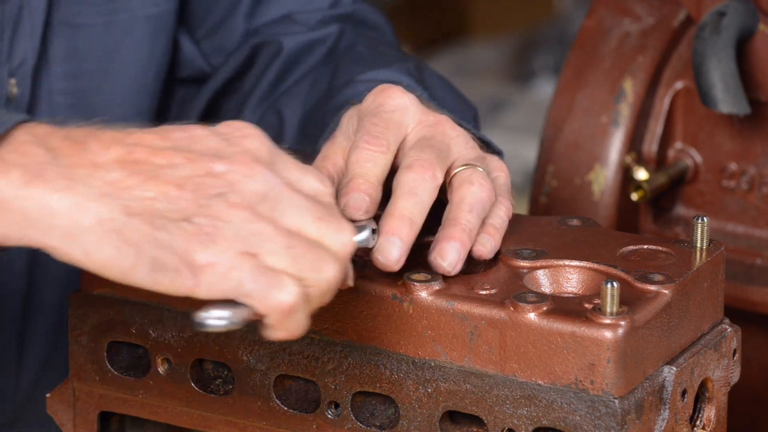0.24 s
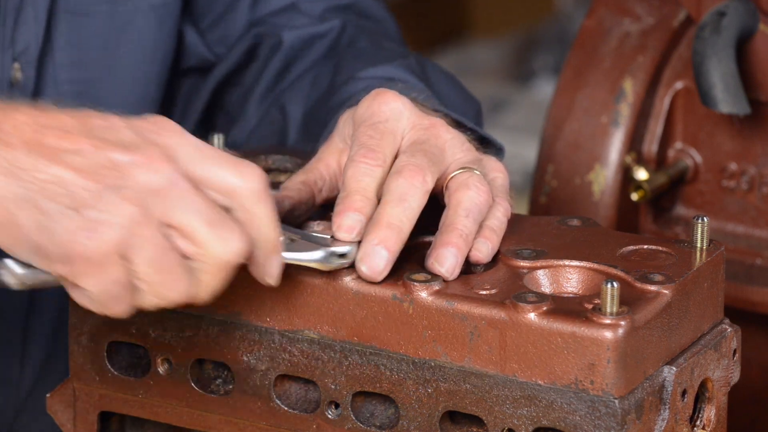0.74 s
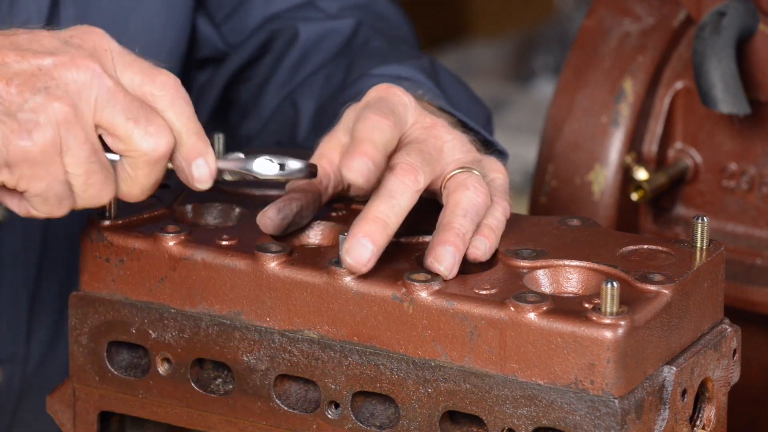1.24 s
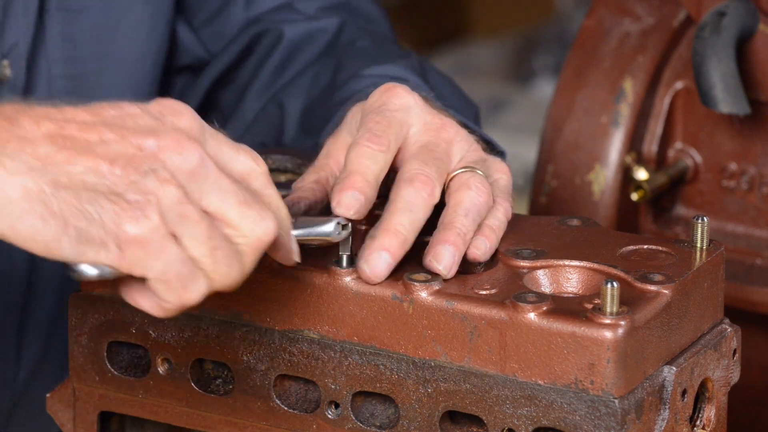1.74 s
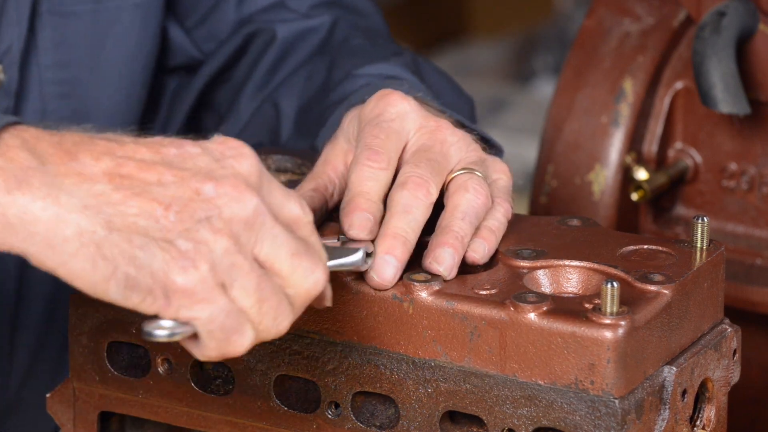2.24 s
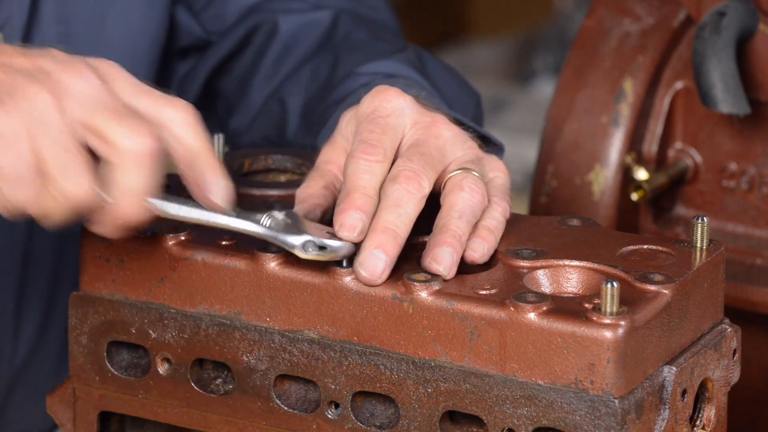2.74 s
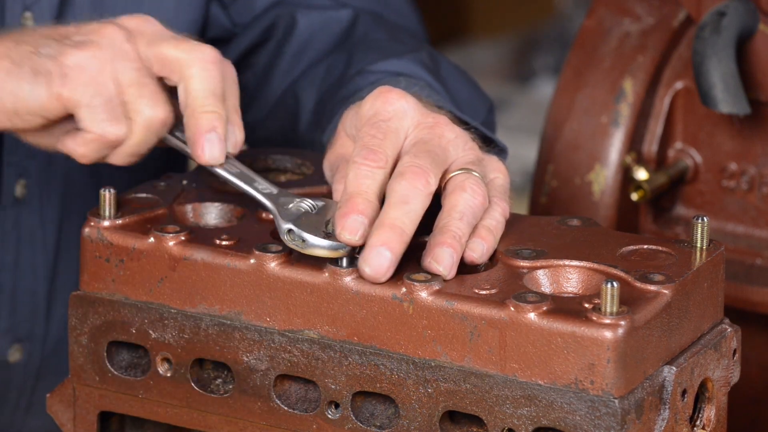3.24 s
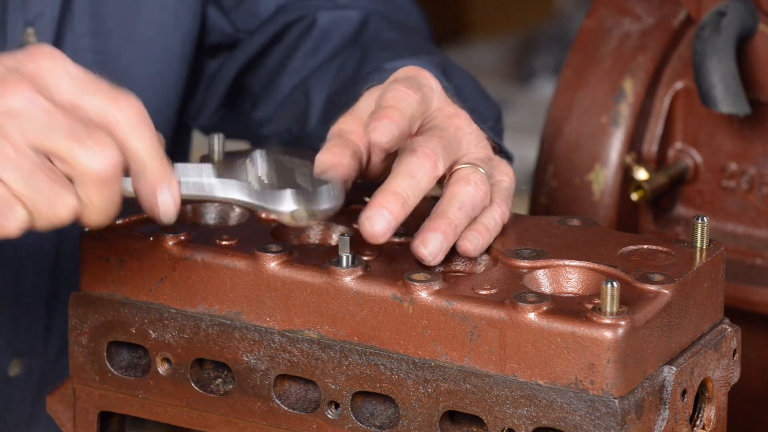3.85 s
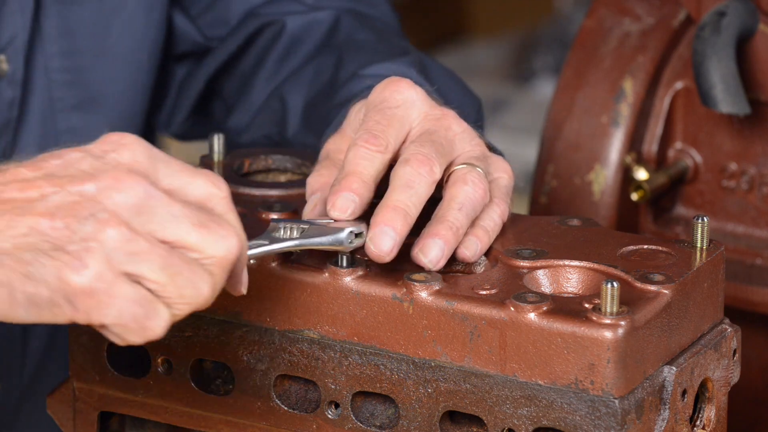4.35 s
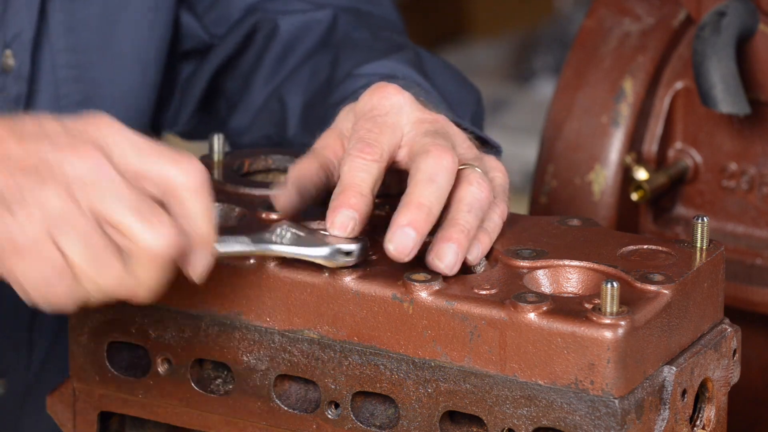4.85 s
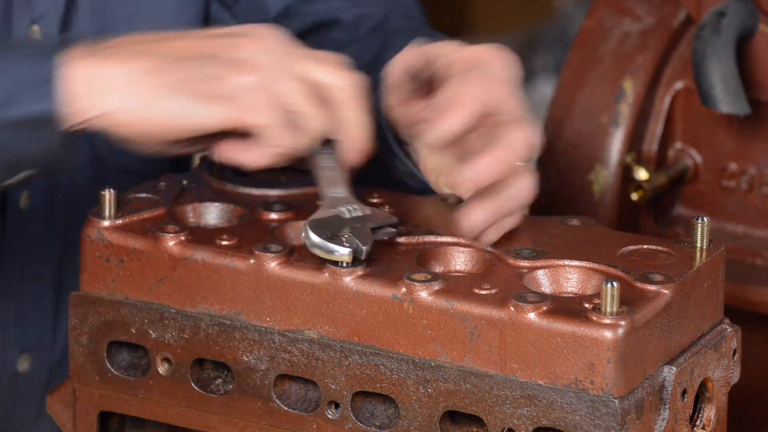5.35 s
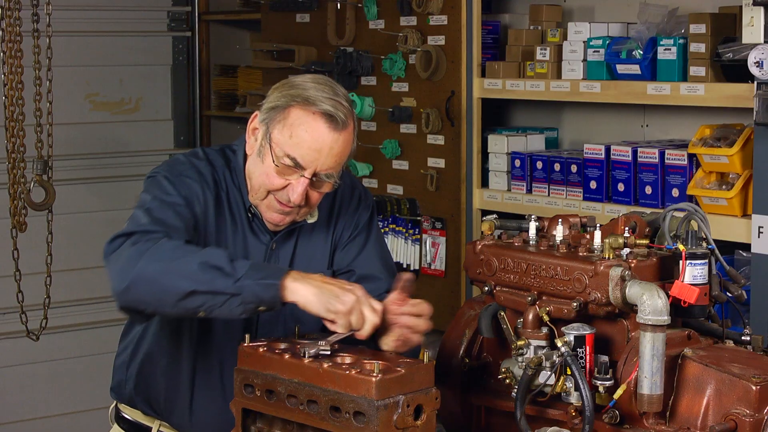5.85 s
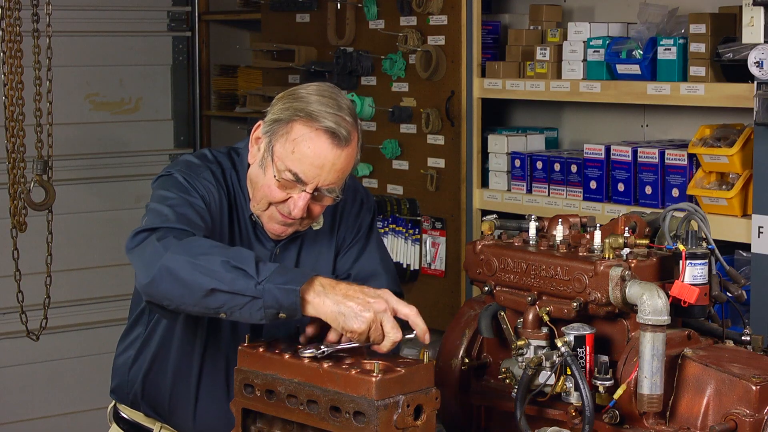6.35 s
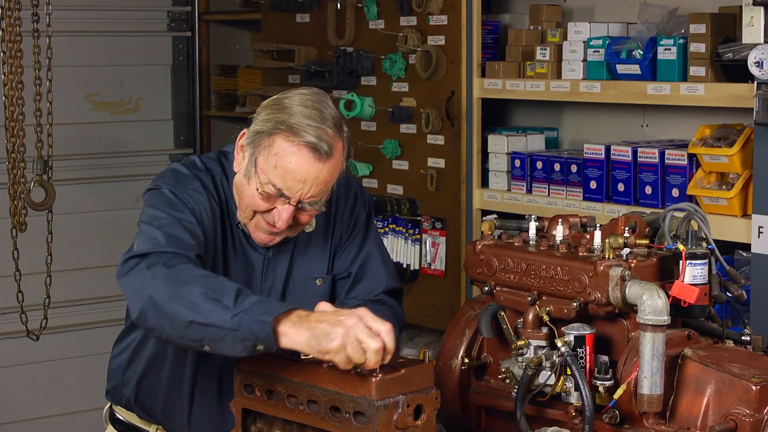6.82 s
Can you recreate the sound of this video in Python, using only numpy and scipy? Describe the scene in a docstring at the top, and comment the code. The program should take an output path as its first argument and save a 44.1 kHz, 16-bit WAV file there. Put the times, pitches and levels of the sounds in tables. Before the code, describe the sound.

Close metallic ticks, gritty thread grinding and low creaks from an engine block, then bright wrench clacks, soft sleeve rustle and faint hum.

```python
"""Turning a thread tap by hand

A hand turns a threading tap in a cast-iron engine block with an adjustable wrench, in a quiet workshop.
Bursts of clicks ring the steel for the ticks, clacks and slips of the loose jaw; soft pushes thud the stand.
Grainy noise through the same ringing parts grinds the thread, a wavering tone groans and sine tones squeak.
Shaped noise gives rustling sleeves and air, over a low hum; a fading noise tail is the small room."""
import sys
import numpy as np
from scipy import signal
from scipy.fft import rfft, irfft
from scipy.io import wavfile
from scipy.ndimage import uniform_filter1d

SR = 44100
rng = np.random.default_rng(int(sys.argv[2]) if len(sys.argv) > 2 else 0)


def materialize(psi):
    """Save the field psi as 16-bit PCM at rate SR to the path in sys.argv[1].

    A 1-D psi becomes a single channel; in a 2-D psi each row is a channel.
    """
    bounded = np.clip(np.atleast_2d(psi).T, -1, 1)
    quanta = np.round(bounded * 32767).astype(np.int16)
    wavfile.write(sys.argv[1], SR, quanta)


N = 312228  # length in samples
DELAY_S = .001  # every contact, thud and squeak starts this many seconds after its listed time


def undb(db):
    """Turn decibels into a plain gain."""
    return 10 ** (np.asarray(db) / 20)


def unit(x):
    """Scale a sound to an average (RMS) level of 1."""
    return x / np.sqrt(np.mean(x ** 2))


def colour(x, points):
    """Shape a noise by (Hz, dB) points."""
    hz, db = np.transpose(points)
    f = np.maximum(np.arange(len(x) // 2 + 1) * SR / len(x), 1)
    gain = undb(np.interp(np.log(f), np.log(hz), db))
    return irfft(rfft(x) * gain, len(x))


def walk(rate):
    """Wander at random: levels held for 1 / rate seconds, then smoothed twice; spread near 1."""
    k = int(SR / rate)
    steps = np.repeat(rng.standard_normal(N // k + 1), k)
    return 1.3 * uniform_filter1d(uniform_filter1d(steps, k), k)[:N]


def rings(modes, size=12000):
    """Make one decaying sine for each way (mode) a part can ring."""
    hz, db, t60 = np.transpose(modes)[:, :, None]
    t = np.arange(size) / SR
    fade = np.exp(-np.log(1000) * t / np.maximum(t60, .01))
    return undb(db) * np.sin(2 * np.pi * hz * t) * fade


def favour(f, hz, octaves):
    """Gain that falls off either side of hz on a log axis."""
    return np.exp(-.5 * (np.log2(f / hz) / max(octaves, .2)) ** 2)


def add(out, s, db, *parts):
    """Mix (dB re peak, sound) parts into out, DELAY_S after time s."""
    i = int((s + DELAY_S) * SR)
    for part_db, x in parts:
        out[i:i + len(x)] += undb(db + part_db) * x / np.abs(x).max()


def curve(table):
    """Join the rows of a table by straight lines, giving one curve per column after the time."""
    s, *columns = np.transpose(table)
    return [np.interp(np.arange(N) / SR, s, c) for c in columns]


# Sharp jaw contacts. Each row: start in seconds, peak of the dry crack in dB, brightest frequency in Hz,
# handle ring in dB above the crack, block ring in dB above the crack, strongest block frequency in Hz.
JAW_HITS = [(0.1265, -15.5, 7840, -19.5, -10.5, 640), (0.2907, -32, 6560, -16, -10.5, 666),
            (0.5742, -39, 5830, -13, -19, 678), (0.601, -27.5, 8600, -24, -16.5, 676),
            (0.64, -30.5, 8350, -25, -30, 680), (0.9735, -57, 3300, -13, -6, 690),
            (1.0216, -45, 3320, 0, 5.5, 660), (1.4032, -30.5, 5500, -13.5, -8, 730),
            (1.508, -25, 7640, -19, -25, 660), (1.6131, -36, 5360, -12.5, -3.5, 660),
            (1.7587, -48, 3320, -6, 1, 678), (1.95, -52, 9820, -2, -8, 875),
            (1.9723, -22.5, 6650, -28, -18, 895), (1.9761, -23.5, 7400, -11, -28, 756),
            (1.9998, -38, 3440, -37, -31, 1290), (2.0095, -28.5, 7900, -21, -36, 754),
            (2.0256, -22, 5200, -16.5, -12.5, 1000), (2.2697, -29, 3360, -21, -4, 684),
            (2.5441, -28, 7600, -33, -21.5, 476), (2.6601, -42.5, 3270, -6.5, -10, 960),
            (2.6895, -64, 5300, -2, 12.5, 970), (3.1394, -58, 10200, -21, -18, 791),
            (3.5303, -53, 10600, -28, -15, 694), (3.676, -57.5, 3460, -1, 11.5, 689),
            (3.7064, -44.5, 3600, -11, -3, 505), (3.7439, -34.5, 5400, -15, -5.5, 830),
            (3.7594, -44.5, 3430, -1.5, -11, 805), (3.7973, -46.5, 3450, -9, 3.5, 797),
            (4.0418, -33, 6400, -46, -36, 519), (4.1091, -48, 9000, -20, -22, 848),
            (4.122, -54, 2200, -12, -25, 848), (4.4208, -3.5, 6100, -16, -54, 1270),
            (4.4424, -21, 8000, -8.5, -12, 1230), (4.4801, -19, 6230, -23, -18, 536),
            (4.6733, -45.5, 3460, -8, 3.5, 905), (4.778, -14, 7700, -18, -25, 665),
            (4.8083, -5, 7160, -15.5, -29, 1346), (4.8123, -7, 7660, -17.5, -28.5, 457),
            (5.0129, -57, 1980, 0, -13, 738), (5.5874, -55.5, 2500, -9, 10.5, 492),
            (5.8169, -38.5, 2890, -11, -21, 740), (6.4893, -38, 2700, -10.5, -22.5, 427)]
# Short slides that swell and fade. Each row: start in seconds, peak of the dry crack in dB,
# brightest frequency in Hz, length scale in ms, block ring in dB above the crack, strongest block Hz.
JAW_SLIPS = [(0.834, -59, 1950, 10, -19, 676), (1.1977, -56, 1940, 10, 7.5, 680),
             (1.3862, -41.5, 3230, 7.4, 0.5, 503), (1.4037, -34, 5350, 11, -38, 684),
             (1.6207, -44, 5400, 4, -18, 692), (1.9865, -25, 2850, 32, -33, 764),
             (2.0284, -39.5, 2540, 9.5, -6, 940), (2.1346, -38.5, 1800, 26, -4.5, 910),
             (2.1685, -42, 2540, 11.2, -2, 474), (2.2746, -29.5, 1940, 16.7, -7.5, 626),
             (2.3435, -54.5, 5380, 18, 12, 681), (2.3989, -47, 2570, 13, -4, 604),
             (2.4986, -35.5, 5230, 18.7, -5.5, 715), (2.7188, -75.5, 1744, 4.8, 21, 920),
             (3.7434, -39, 1890, 13, -4, 824), (3.808, -42.5, 7500, 14, -21, 740),
             (3.8235, -33, 3600, 16, -12, 756), (4.8984, -46, 2730, 43, 3, 840),
             (4.9548, -44, 1300, 19.5, 7.5, 690), (4.9839, -50.5, 1256, 13.3, 6, 790),
             (5.214, -55.5, 1315, 20, -22.5, 1310), (5.3594, -51.5, 5580, 29.5, -12, 760),
             (5.8259, -47, 6880, 18, -25, 719), (6.362, -46, 3350, 38, -13.5, 695)]
# Ringing of the wrench jaws. Each row: usual pitch in Hz, usual level in dB, time to fade by 60 dB in seconds.
JAW_MODES = [(3240, -4.5, 0.12), (3643, -15.5, 0.018), (4160, -5, 0.035), (4800, -7.5, .04),
             (4707, -5, 0.086), (4865, -11.5, .05), (5260, -12, 0.21), (5582, 5.5, .04),
             (6270, -1.5, 0.038), (6370, -24.5, 0.078), (7696, 7, 0.096), (8200, 2, 0.022),
             (8630, 1, 0.021), (9050, -2, 0.04), (9660, -7.5, 0.037), (10540, -14, 0.014), (14700, -8, .02),
             (15500, -15.5, .02)]
# Bending of the handle. Each row: usual pitch in Hz, usual level in dB, time to fade by 60 dB in seconds.
HANDLE_MODES = [(1840, -2.5, .06), (1961.5, 4, 0.097), (2329, 2, 0.041), (2580, 1, 0.097),
                (2706, -11, 0.061)]
# Ringing of the iron block. Each row: pitch in Hz, level in dB, time to fade by 60 dB in seconds.
BLOCK_MODES = [(476.1, -1.5, 0.11), (699, -1.5, 0.11), (802, 3, 0.048), (961, -9, 0.12), (1323, -6.5, .05)]
CHATTER_MS, CHATTER_MS_PER_DB = 4.82, 0.11  # a full-scale blow chatters longest
HIT_JAW_DB, SLIP_JAW_DB, SLIP_HANDLE_DB = -8.5, -6, -17  # ring above the crack's peak
# width of the favoured range at 3 kHz, less by NARROWING for each octave brighter
WIDTH_OCTAVES, NARROWING, BLOCK_OCTAVES = 1.077, 0.22, .32


def contacts(scatter_db=2.5, crack_ms=0.7, detune=.004, rattle=1.6):
    """Clicks make the crack and ring the jaws; a short push (hits) or the clicks (slips) ring handle and block."""
    block = rings(BLOCK_MODES, size=7000)
    flutter = 1 + rattle * walk(330)
    out = np.zeros(N + 20000)
    t_ms = np.arange(4000) * 1000 / SR
    f = np.maximum(np.arange(257) * SR / 512, 50)
    soft = 1 / (1 + (f / 12000) ** 4)  # the crack softens gently above 12 kHz
    hits = [(s, db, hz, CHATTER_MS + CHATTER_MS_PER_DB * db, HIT_JAW_DB, *rest, True)
            for s, db, hz, *rest in JAW_HITS]
    slips = [(s, db, hz, ms, SLIP_JAW_DB, SLIP_HANDLE_DB, *rest, False)
             for s, db, hz, ms, *rest in JAW_SLIPS]
    for s, db, hz, ms, jaw_db, handle_db, block_db, block_hz, sharp in hits + slips:
        chance = rng.standard_normal((3, len(t_ms)))
        ms = max(ms, .2)
        clicks = chance[0] * np.abs(chance[0])
        chatter = clicks * np.exp(-(t_ms / ms) ** (1.6 if sharp else 3))
        if sharp:
            chatter *= np.minimum(t_ms / .5 + .3, 1)
            chatter[22] = 4  # the main click, half a millisecond in
        else:
            chatter *= t_ms / ms  # a slip swells first
        octaves = WIDTH_OCTAVES - NARROWING * np.log2(hz / 3000)
        crack = np.roll(irfft(soft * favour(f, hz, octaves)), 6) * np.exp(-t_ms[:512] / crack_ms)
        # the grip shifts the steel's modes a little from one contact to the next
        steel = np.array(JAW_MODES + HANDLE_MODES)
        steel[:, 0] *= 1 + detune * chance[2, :len(steel)]
        steel[:, 1] += scatter_db * chance[1, :len(steel)]
        # the loose jaw rattles on, so every mode flutters as it fades
        flutter_start = rng.integers(N - 5000, size=(len(steel), 1))
        ring = rings(steel, size=5000) * flutter[flutter_start + np.arange(5000)]
        # the struck spot favours the modes near its brightest frequency
        jaws = len(JAW_MODES)
        jaw = favour(steel[:jaws, 0], hz, octaves) @ ring[:jaws]
        bend = ring[jaws:].sum(axis=0)
        boom = favour(np.array(BLOCK_MODES)[:, 0], block_hz, BLOCK_OCTAVES) @ block
        push = np.hanning(12) if sharp else chatter
        add(out, s, db,
            (0, signal.fftconvolve(chatter, crack)),
            (jaw_db, signal.fftconvolve(chatter, jaw)),
            (handle_db, signal.fftconvolve(push, bend)),
            (block_db, signal.fftconvolve(push, boom)))
    return out[:N]


# Knocks passed into the stand. Each row: start in seconds, peak in dB before the low cut,
# strongest frequency in Hz, length of the push in ms.
KNOCKS = [(0.129, -24, 175, 6.2), (0.133, -25.5, 323, 5.2), (0.289, -48, 226, 18), (0.65, -39.5, 164, 15),
          (1.031, -40, 264, 9.5), (1.256, -47.5, 237, 8.3), (1.391, -39.5, 234, 8.3),
          (1.613, -36.5, 196, 3.4), (1.97, -42, 237, 13), (2.18, -43, 334, 7.8), (2.282, -39, 390, 16.7),
          (2.439, -41, 191, 9.5), (2.549, -47.5, 223, 7.9), (3.354, -50.5, 167, 15),
          (3.698, -40.5, 178, 21), (4.422, -34, 218, 8.3), (4.488, -37, 210, 5.8), (4.806, -27.5, 215, 7.6),
          (4.956, -35.5, 242, 8), (5.599, -44.5, 191, 6), (5.905, -45.5, 296, 19), (5.943, -46, 310, 12),
          (6.411, -50, 318, 11), (6.499, -48, 159, 5.8)]
# Ringing of the stand. Each row: pitch in Hz, level in dB, time to fade by 60 dB in seconds.
STAND_MODES = [(175, 1, 0.19), (214.3, 6.5, 0.11), (256.7, -1, 0.12), (309.8, -3, 0.07), (357, -20, 0.082)]


def thuds():
    """A soft push rocks the stand, mostly in the mode nearest the knock."""
    out, stand = np.zeros(N + 20000), rings(STAND_MODES)
    for s, db, hz, ms in KNOCKS:
        size = int(ms * SR / 1000)
        push = np.hanning(size) * np.cos(2 * np.pi * hz * np.arange(size) / SR)
        boom = favour(np.array(STAND_MODES)[:, 0], hz, 0.27) @ stand
        add(out, s, db, (0, signal.fftconvolve(push, boom)))
    low_cut = signal.butter(2, 110, "high", fs=SR, output="sos")
    return signal.sosfilt(low_cut, out[:N])


# Brief squeaks of steel on steel. Each row: start in seconds, peak in dB, middle pitch in Hz, length in ms.
STEEL_SQUEAKS = [(.77, -57, 6500, 26), (1.398, -35, 5440, 9.9), (2.347, -45, 5440, 19),
                 (2.396, -47, 5780, 16), (2.506, -42, 5630, 20), (3.445, -59.5, 1400, 7.9),
                 (5.45, -60.5, 1940, 54), (6.802, -67, 1277, 38.9), (6.901, -72, 2545, 177)]


def squeaks(rough=.012):
    """Quick regular stick-slip: a short tone with an unsteady pitch."""
    out = np.zeros(N + 20000)
    wobble = 1 + rough * walk(300)
    for s, db, hz, ms in STEEL_SQUEAKS:
        size = int(ms * SR / 1000)
        phase = 2 * np.pi * np.cumsum(hz * wobble[int(s * SR):][:size]) / SR
        add(out, s, db, (0, np.hanning(size) * np.sin(phase)))
    return out[:N]


def grit(rate, spread_db):
    """Dense tiny slips of uneven size and sign, rate of them per second."""
    slips = (rng.random(N) < rate / SR) * rng.standard_normal(N)
    return slips * undb(spread_db * rng.exponential(size=N))


def driven(modes, x, wander_db=3.5):
    """Let a sound ring a part; as the point of contact wanders, each mode comes and goes."""
    return unit(sum(signal.oaconvolve(x, ring)[:N] * undb(wander_db * walk(9))
                    for ring in rings(modes, size=6000)))


# Cutting of the tap. Each row: time in seconds, groan of the block in dB, thread grinding in dB,
# load on the stand in dB.
CUTTING_LEVELS = [(0, -71, -64, -54), (.12, -75, -60.5, -56), (.25, -64.5, -74.5, -60), (.6, -55, -72, -57),
                  (.9, -55.5, -74, -55), (1.2, -59.5, -75, -57.5), (1.45, -72, -66, -54.5),
                  (1.65, -71, -81, -62), (1.85, -65, -80, -62.5), (2.05, -59, -74, -53),
                  (2.17, -63, -56.5, -51.5), (2.38, -55.5, -62, -52.5), (2.53, -66, -59, -55.5),
                  (2.62, -97, -74, -66), (2.8, -101, -77, -71.5), (4.36, -88.5, -86, -72.5),
                  (4.75, -80.5, -75, -67.5), (4.9, -71.5, -61, -65), (4.99, -70, -66, -54),
                  (5.07, -85, -85.5, -64.5), (5.3, -88.5, -70, -65), (5.6, -79, -66.5, -62),
                  (6.43, -79, -77, -64), (6.66, -91, -79, -64.5), (7.08, -91.5, -78, -65.5)]


def cutting():
    """Stick-slip at the tap makes the block groan, grinds the thread and loads the stand."""
    groan_db, grind_db, load_db = curve(CUTTING_LEVELS)
    # the cutting edge partly locks to the block's main mode
    main_mode = BLOCK_MODES[1:2]
    phase = 2 * np.pi * np.cumsum(main_mode[0][0] * (1 + .012 * walk(30))) / SR
    locked = np.sin(phase) * undb(3.5 * walk(40))
    loose = driven(main_mode, rng.standard_normal(N), wander_db=0)
    groan = unit(unit(locked) + undb(-3) * loose)
    chips = grit(1500, 1.6) * undb(2.5 * walk(22))
    crunch = unit(colour(chips, [(150, -31), (330, -1), (800, -5), (1500, -13.5), (4000, -43)]))
    grind = driven(BLOCK_MODES, chips) + undb(-8.0) * crunch
    load = driven(STAND_MODES, rng.standard_normal(N) * undb(3.0 * walk(12)))
    return undb(groan_db) * groan + undb(grind_db) * grind + undb(load_db) * load


# The wrench rubbing on steel. Each row: time in seconds, handle rub in dB, jaw scraping in dB.
SLIDING_LEVELS = [(0, -74, -79), (.37, -71, -67), (.69, -66.5, -66), (1.12, -74.5, -66.5), (1.83, -78, -79),
                  (2.09, -70, -67), (2.15, -58.5, -58.5), (2.4, -63, -59.5), (2.53, -63, -58),
                  (2.62, -98, -86), (2.9, -87, -83), (3.14, -83.5, -74.5), (3.45, -88, -85.5),
                  (3.71, -100, -77.5), (3.88, -83, -74), (4.2, -86, -79.5), (4.67, -84, -74.5),
                  (4.86, -72.5, -73), (4.97, -64, -64), (5.06, -84, -76), (5.4, -74.5, -74.5),
                  (5.94, -77.5, -68.5), (6.4, -76, -67.5), (6.66, -86.5, -77.5), (7.08, -78.5, -76.5)]


def sliding():
    """Stick-slip grit rings handle and jaws, with a duller and a brighter rubbing noise."""
    handle_db, scrape_db = curve(SLIDING_LEVELS)
    slips = grit(3500, 1.1) * undb(2.4 * walk(60))
    rub = unit(colour(slips, [(900, -19.5), (1600, -5.0), (2200, -8.5), (3000, -7.0), (6000, -42.0)]))
    handle = undb(4) * driven(HANDLE_MODES, slips) + rub
    rasp = unit(colour(slips, [(1500, -24.5), (3000, -2.0), (5500, 1.5), (9000, -5.0), (16000, -22.5)]))
    scrape = undb(-10.5) * driven(JAW_MODES, slips) + rasp
    return undb(handle_db) * handle + undb(scrape_db) * scrape


# How loud the sleeves are. Each row: time in seconds, rustle in dB.
RUSTLE_LEVELS = [(0.0, -70.5), (0.59, -68.5), (1.87, -74), (1.99, -65), (2.15, -67), (2.4, -67.5),
                 (2.64, -99), (2.9, -77.5), (3.1, -73), (3.63, -81.5), (3.92, -74), (4.18, -81),
                 (5.3, -72.5), (6.03, -65), (6.7, -73), (7.08, -74)]
# Tone of the cloth. Each row: frequency in Hz, relative level in dB per Hz.
CLOTH_TONE = [(590, -30.5), (1000, -2.5), (1880, -8), (3940, -4), (11700, -6), (15200, -10), (15900, -13.5),
              (16500, -36.5)]


def sleeves():
    """Cloth gives a soft wide rustle: unsteady noise with a broad treble."""
    rustle_db, = curve(RUSTLE_LEVELS)
    cloth = unit(colour(rng.standard_normal(N) * undb(0.82 * walk(25)), CLOTH_TONE))
    return undb(rustle_db) * cloth


# How long the room rings. Each row: frequency in Hz, time to fade by 60 dB in seconds.
ROOM_FADE = [(300, 0.38), (2000, 0.35), (6000, 0.24), (14000, 0.11)]
ROOM_DB = -11.5  # room tail against the direct sound


def room(x):
    """Shelves and walls answer with a dense tail that dies faster in the treble."""
    t, tail = np.arange(20000) / SR, 0
    hz, t60 = np.transpose(ROOM_FADE)
    for f in 177 * 2. ** np.arange(7):  # one band per octave
        octave = signal.butter(2, [f / 2 ** .5, f * 2 ** .5], "band", fs=SR, output="sos")
        band = signal.sosfilt(octave, rng.standard_normal(len(t)))
        tail = tail + band * np.exp(-np.log(1000) * t / np.interp(np.log(f), np.log(hz), t60))
    tail = tail * np.clip(t / 0.0036 - .4, 0, 1)  # starts just after the direct sound
    return undb(ROOM_DB) * signal.fftconvolve(x, tail / np.sqrt(np.sum(tail ** 2)))[:N]


# Tone of the still air. Each row: frequency in Hz, relative level in dB per Hz.
AIR_TONE = [(12, -36.5), (20, -7), (44, 0.5), (71, 2), (156, -10), (224, -15.5), (404, -30.5), (670, -27),
            (1560, -32), (1950, -39.5), (2120, -34), (3830, -57), (15200, -40), (16500, -61.5)]
AIR_DB = -60.0  # average (RMS) level
HUM_HZ, HUM_DB = 62.9, -62  # middle pitch and middle RMS level


def air():
    """Rumble and hiss as shaped noise, with a wavering low hum."""
    phase = 2 * np.pi * np.cumsum(HUM_HZ * (1 + 0.02648 * walk(3.0))) / SR
    hum = np.sqrt(2) * np.sin(phase) * undb(HUM_DB + 2.7 * walk(4))
    return undb(AIR_DB) * unit(colour(rng.standard_normal(N), AIR_TONE)) + hum


OWN_DB = -41.5  # room and air that differ between the two sides


def scene():
    """Add up the work at the block, its room and the air, for two sides."""
    near = contacts() + thuds() + squeaks() + cutting() + sliding() + sleeves()
    mono = near + room(near) + air()
    # the two sides hear room and air a little differently
    side = undb(OWN_DB) * (room(near) + air())
    return np.array([mono + side, mono - side])


LEFT_DB, HISS_DB = -.7, -79  # left gain against right; hiss before the top is cut
TOP_HZ = 16300


def record(dry):
    """Two channels of slightly unlike gain, each with its own faint microphone hiss; the top is cut."""
    gains = undb([[LEFT_DB / 2], [-LEFT_DB / 2]])
    x = dry * gains + undb(HISS_DB) * rng.standard_normal(dry.shape)
    return signal.sosfilt(signal.ellip(10, .2, 60, TOP_HZ, fs=SR, output="sos"), x)


dry = scene()
out = record(dry)
materialize(out)
```